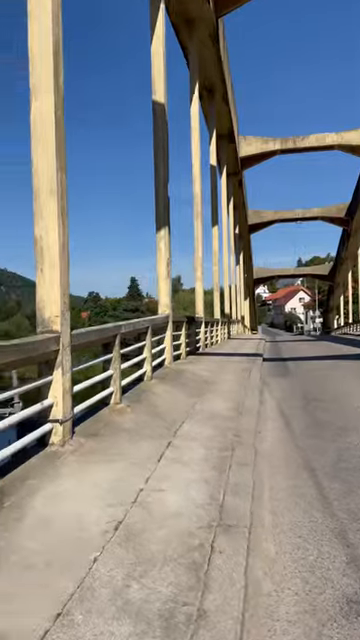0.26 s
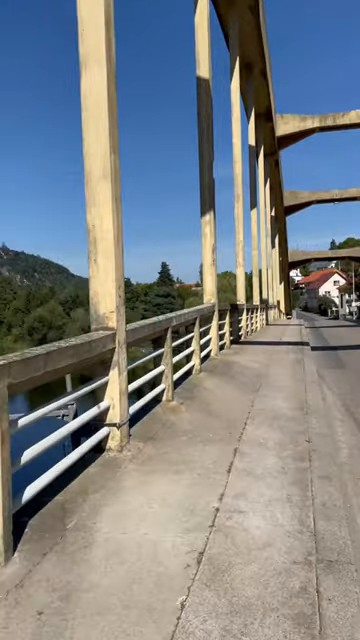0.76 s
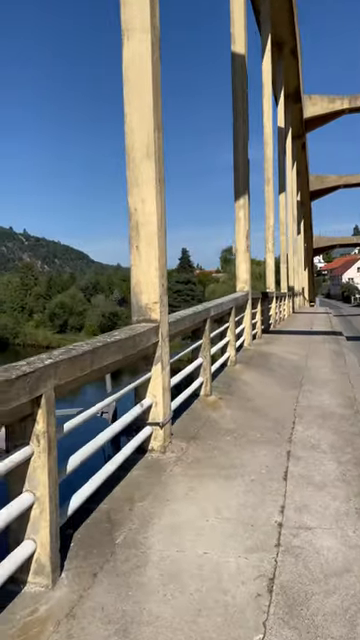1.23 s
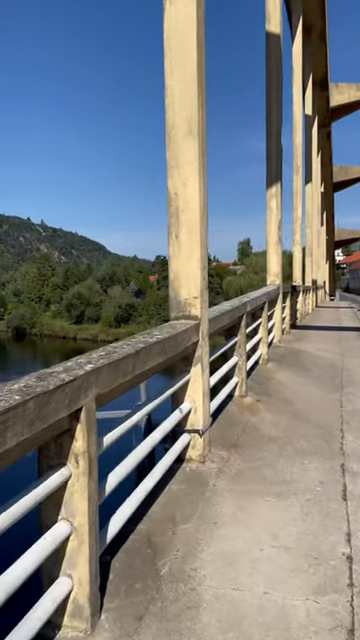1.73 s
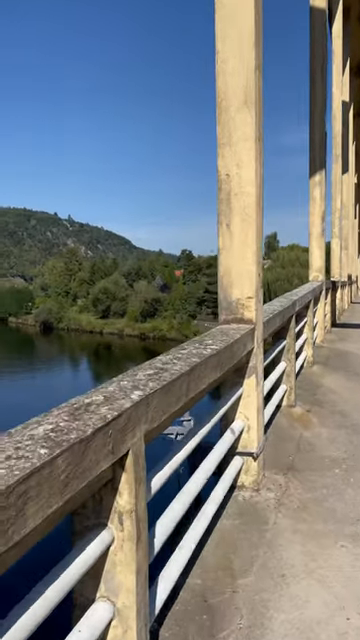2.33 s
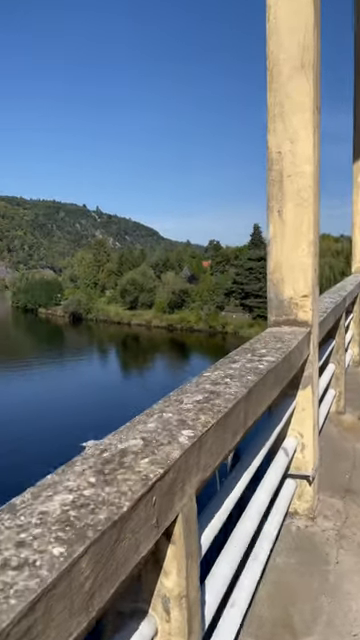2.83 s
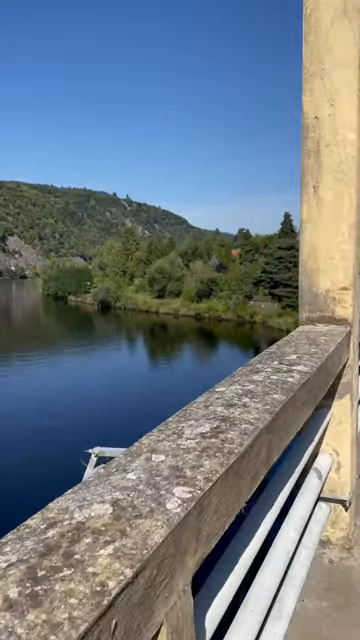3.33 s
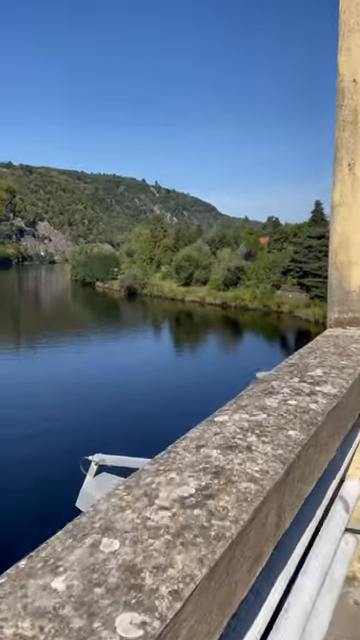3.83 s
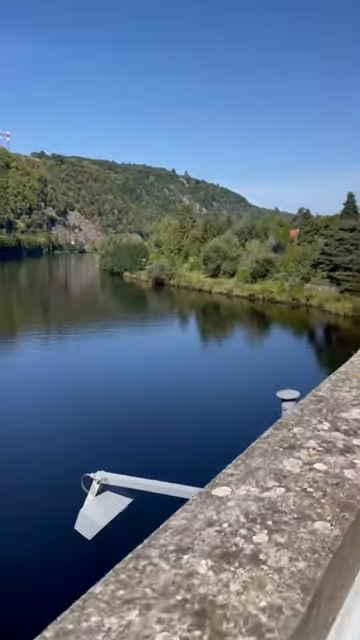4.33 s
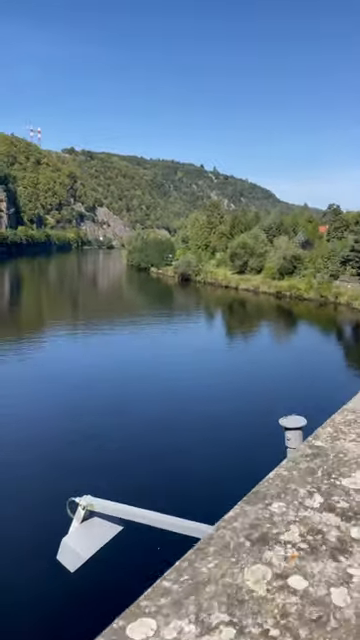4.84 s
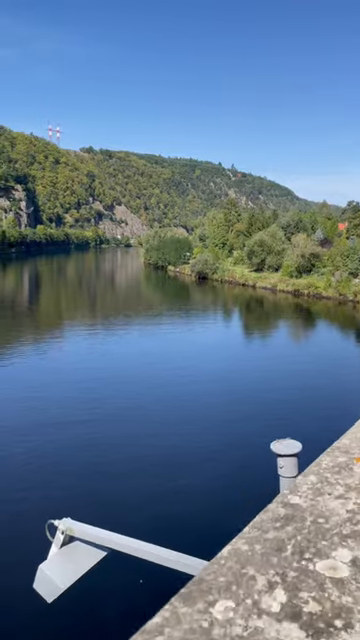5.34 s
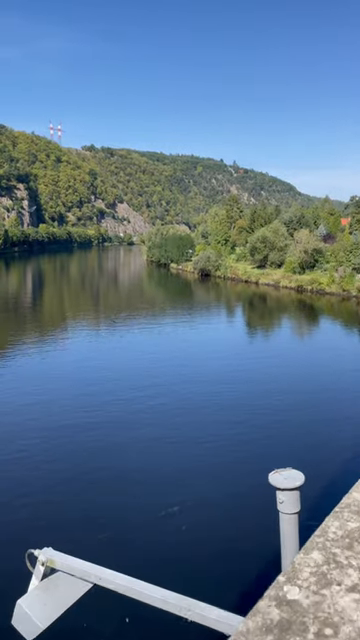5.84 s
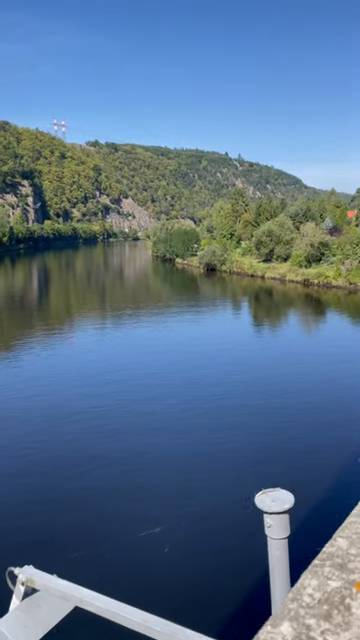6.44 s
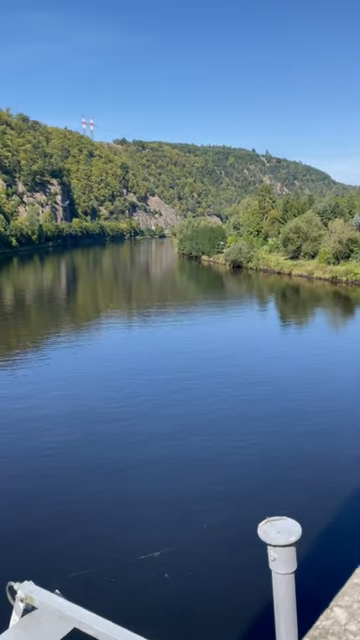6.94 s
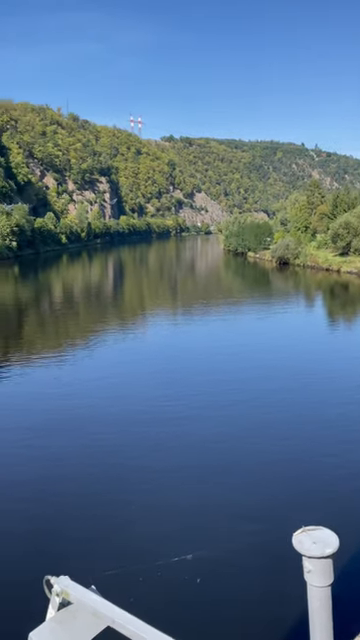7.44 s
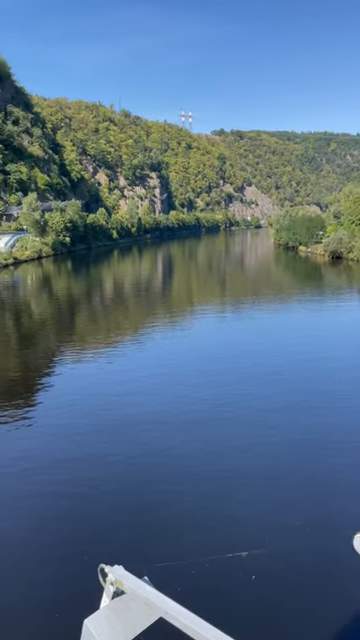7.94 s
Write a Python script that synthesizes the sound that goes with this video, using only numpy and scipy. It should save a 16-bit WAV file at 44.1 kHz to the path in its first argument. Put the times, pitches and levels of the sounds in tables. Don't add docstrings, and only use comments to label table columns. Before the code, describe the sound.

A heavy vehicle pulls up through its gear and shifts on a bridge, tyres roaring past, deck joints thumping, keys jingling faintly close by.

```python
import sys
import numpy as np
from scipy import signal
from scipy.fft import rfft, irfft, next_fast_len
from scipy.io import wavfile

SR = 44100
rng = np.random.default_rng(int(sys.argv[2]) if len(sys.argv) > 2 else 0)


def generate_wav(sig):
    pcm = np.round(np.clip(np.atleast_2d(sig).T, -1, 1) * 32767).astype(np.int16)
    wavfile.write(sys.argv[1], SR, pcm)


def boost(x):
    u = np.asarray(x, float) / 20
    return 10 ** u


N = 360738
COARSE = 40


def in_time(rows):
    start_s, *columns = np.transpose(rows)
    t = np.arange(N) / SR
    gate = np.clip(np.minimum(t - start_s[0] + .1, start_s[-1] + .1 - t) / .1, 0, 1)
    return [np.interp(t, start_s, column) for column in columns], gate


def at_hz(points, hz, column=1):
    table = np.array(points)
    return np.interp(np.log(hz), np.log(table[:, 0]), table[:, column])


def fine(coarse, at=None):
    samples = np.arange(N) if at is None else at
    return np.interp(samples / COARSE, np.arange(len(coarse)), coarse)


def drift(rate_hz):
    pole = np.exp(-2 * np.pi * COARSE * rate_hz / SR)
    noise = rng.standard_normal(N // COARSE + 2001)
    slow = signal.lfilter([1], [1, -2 * pole, pole * pole], noise)[2000:]
    return slow / slow.std()


def band(x, low_hz, high_hz):
    return signal.sosfilt(signal.butter(2, [low_hz, high_hz], "band", fs=SR, output="sos"), x)


def clicks_at(times_s, sizes):
    out = np.zeros(N)
    out[(np.asarray(times_s) * SR).astype(int)] = sizes
    return out


def ring(clicks, hz, t60_s):
    pole = boost(-60 / (t60_s * SR))
    turn = 2 * np.pi * hz / SR
    return signal.lfilter([0, np.sin(turn)], [1, -2 * pole * np.cos(turn), pole * pole], clicks + 1e-18)


def orders(hz, gate, multiples, levels_db, wobble_db, stray_rad):
    on = np.flatnonzero(gate)
    out = np.zeros(N)
    phase = 2 * np.pi * np.cumsum(hz[on]) / SR
    for k, level_db in zip(multiples, levels_db):
        size = np.sqrt(2) * fine(boost(level_db[::COARSE] + wobble_db * drift(5.7)), on)
        stray = fine(stray_rad * drift(2.4), on)
        out[on] += gate[on] * size * np.sin(k * phase + stray + 7 * k)
    return out


def swell(start_s, end_s, start_hz, end_hz, peak_db, multiple=1):
    rows = [(start_s, start_hz, peak_db - 4),
            ((start_s + end_s) / 2, (start_hz + end_hz) / 2, peak_db),
            (end_s, end_hz, peak_db - 4)]
    (hz, level_db), gate = in_time(rows)
    return orders(hz, gate, [multiple], [level_db], wobble_db=1.5, stray_rad=.3)


# start_s, firing_hz, level_db, boom_db (exhaust), rasp_db
ENGINE_PULL = [(0, 55.74, -43, -60, -51.5), (.12, 57, -39, -51, -55), (.25, 57.8, -46, -53, -53),
               (.5, 59.4, -39, -43, -56), (.8, 61.8, -43.5, -40.5, -54),
               (1.2, 65.33, -37.5, -47, -52.5), (1.48, 67.83, -35.5, -35.5, -44),
           (1.8, 70.8, -34.5, -37, -43.5), (2.15, 74.5, -36.5, -34.5, -40.5),
           (2.3, 75.28, -29.5, -34.5, -54), (2.58, 77.85, -30.5, -35.5, -49), (2.72, 79.2, -31, -25.5, -55),
           (3.1, 82, -33.5, -22.5, -51.5), (3.35, 84.1, -33.5, -30, -43)]
# start_s, firing_hz, level_db, boom_db, rasp_db
GEAR_SHIFT = [
    (3.72, 85.1, -32, -30.5, -52.5),
    (3.9, 85.54, -33.5, -25.5, -55),
    (4.019, 84.45, -44.5, -32.5, -52),
    (4.15, 77.9, -26.5, -30, -59),
    (4.35, 70.34, -50, -25.5, -57),
    (4.52, 63.75, -49, -34.5, -60),
    (4.75, 59.5, -47.5, -47, -45),
]
# firing_multiple, level_db
RASP_ORDERS = [(3.5, -6), (4, -2), (13 / 3, 2.4), (14 / 3, -9), (5, -2), (5.5, 0), (6.7, -16)]
# pitch_hz, gain_db
PIPE_GAIN = [(165, -2), (172, 4), (180, 1), (188, -10), (238, -16), (247, -4), (255, -10)]


def heavy_engine():
    (hz, level_db, boom_db, rasp_db), gate = in_time(ENGINE_PULL + GEAR_SHIFT)
    third_db = level_db + at_hz(PIPE_GAIN, 3 * hz)
    firing = orders(hz, gate, [1, 2, 3], [level_db, boom_db, third_db], wobble_db=1.5, stray_rad=.2)
    multiples = [k for k, db in RASP_ORDERS]
    levels_db = [rasp_db + db for k, db in RASP_ORDERS]
    return firing + orders(hz, gate, multiples, levels_db, wobble_db=3.0, stray_rad=0.74)


# shaft_multiple, start_s, end_s
ONCOMING_SWELLS = [(2, 2.15, 3.75), (3, 2.25, 2.4), (3, 2.5, 3.0), (3, 3.15, 3.78), (5, 2.15, 2.35),
                   (5, 2.5, 3.05), (6, 2.45, 3.05), (6, 3.3, 3.8)]
ONCOMING_PEAKS = [-38, -36, -36, -33, -34, -33.5, -37, -36.5]


def oncoming_engine():
    def shaft_hz(s):
        return 38.9 - 3.5 * (s - 2.05)

    out = np.zeros(N)
    for (k, start_s, end_s), peak_db in zip(ONCOMING_SWELLS, ONCOMING_PEAKS):
        out += swell(start_s, end_s, shaft_hz(start_s), shaft_hz(end_s), peak_db, k)
    return out


# start_s, end_s, start_hz,
# end_hz
FAR_HUMS = [(0, .72, 100, 101), (.15, .7, 228, 244), (1.35, 1.75, 157, 162), (4.4, 4.75, 321, 324),
            (3.95, 4.7, 79, 80), (4.8, 5.3, 86.5, 84), (4.7, 5.6, 74, 71), (5.75, 6.05, 68.5, 67),
            (4.0, 5.35, 48.5, 47.8), (5.52, 5.65, 62, 60), (6.05, 6.55, 47.5, 45.8), (4.62, 5.0, 172, 152),
            (5.3, 5.78, 138, 129), (5.88, 6.33, 190, 180.5), (6.9, 7.1, 184.3, 184.5),
            (6.25, 7.05, 113.5, 112), (7.18, 7.3, 109, 109), (7.4, 7.5, 112.5, 112),
            (7.72, 8.3, 107, 104.5), (6.65, 6.85, 66, 66.7), (7.15, 7.42, 65.5, 66), (7.55, 7.72, 64.5, 65),
            (8.02, 8.3, 65, 63.5), (7.75, 8.3, 238, 226), (7.9, 8.3, 171.7, 169), (7.62, 7.75, 132, 130),
            (.05, .18, 47, 46), (4.95, 5.3, 191, 192)]
FAR_HUM_PEAKS = [-41, -44, -43.5, -43, -33.5, -35, -35, -37, -39, -40, -45, -35, -35.5, -35.5, -40, -39,
                 -33.5, -34.5, -31, -37, -33, -32, -31.5, -40.5, -44, -37.5, -37, -43]


def far_engines():
    return sum(swell(*row, peak_db) for row, peak_db in zip(FAR_HUMS, FAR_HUM_PEAKS))


# start_s, peak_db, ring_hz
DECK_JOINTS = [(1.144, -24, 141), (1.174, -17, 179), (1.204, -16.5, 190), (1.256, -24, 243),
               (1.299, -20.5, 176), (1.324, -20, 211), (2.099, -18, 140), (2.224, -16, 188),
               (2.299, -16.5, 159), (2.347, -14, 142), (2.375, -14, 156), (2.519, -14.5, 139),
               (2.547, -19, 132.3), (2.708, -12.5, 156), (2.739, -25, 161), (5.57, -16, 136)]


def joints():
    out = sum(ring(clicks_at([s], boost(db)), hz, t60_s=0.053) for s, db, hz in DECK_JOINTS)
    return band(out, 70, 450)


# pitch_hz, level_db, t60_s
MODES = [
    (6815, -14, .035),
    (9200, -18, .025),
    (9950, -6, .03),
    (14510, -13, .04),
    (15300, -10, .035),
]
# start_s, high_ring_db, low_ring_db, tick_db
BUNCH = [(0.0014, -45, -45, -65), (0.0214, -53, -48, -59), (0.0513, -51, -50, -57), (0.071, -51, -43, -56),
         (0.0844, -51, -49.5, -57), (0.0997, -46, -50, -66), (0.1114, -53, -51, -61),
         (0.122, -51, -50, -58), (0.6335, -57, -45, -54), (1.8053, -49, -60, -62)]
# start_s, high_ring_db, low_ring_db, tick_db
KEY_TICKS = [(0.2633, -74, -75, -59), (0.5641, -65, -75, -52), (0.621, -57, -75, -53),
             (0.6544, -65, -75, -55), (0.7816, -64, -75, -60), (0.8734, -61, -75, -55),
             (1.0326, -65, -76, -66), (1.1395, -51, -62, -45), (1.152, -64, -75, -50),
             (1.3119, -63, -75, -63), (1.367, -63, -70, -59), (1.4037, -63, -75, -67),
             (1.501, -59, -75, -49), (1.8976, -49, -75, -55), (6.2647, -62, -75, -50),
             (6.3824, -62, -75, -56), (7.1536, -66, -75, -61), (7.3622, -59, -77, -59),
             (7.8311, -65, -75, -66), (8.155, -58, -75, -53)]


def keys():
    start_s, high_db, low_db, tick_db = np.transpose(BUNCH + KEY_TICKS)
    chance = rng.normal(0, 1, (len(start_s), 8))
    bounce_s = 0.0051
    out = np.zeros(N)
    for k, (hz, level_db, t60_s) in enumerate(MODES):
        ring_db = high_db if hz > 12000 else low_db
        size = boost(ring_db + level_db + 4.0 * chance[:, k])
        touches = clicks_at(start_s, size) + clicks_at(start_s + bounce_s, 1.2 * size)
        out += ring(touches, hz, t60_s)
    decay = signal.lfilter([1], [1, -.992], clicks_at(start_s, boost(tick_db + 0.5)))
    return out + band(decay * rng.standard_normal(N), 6800, 14000)


# start_s, edge_db (bright), body_db (hollow)
GRIT_TICKS = [(3.019, -46, -47), (4.4455, -46, -55), (4.4555, -55, -37), (4.4595, -44, -44),
              (4.4745, -40, -50), (4.4845, -49, -32), (4.495, -48, -50), (4.7894, -55, -55),
              (5.3655, -41, -43), (5.467, -45, -39), (5.8719, -49, -50), (6.4994, -51, -50),
              (7.048, -53, -46)]
# low_hz, high_hz, level_db
GRIT_BANDS = [
    (2200, 3300, 0),
    (4000, 5000, -6),
    (5900, 8600, 2),
    (8800, 14500, -10),
]


def scuffs():
    start_s, edge_db, body_db = np.transpose(GRIT_TICKS)
    grit = rng.standard_normal(N)
    trail_s = .003
    out = 0
    for low_hz, high_hz, level_db in GRIT_BANDS:
        tick_db = level_db + (body_db if high_hz < 3500 else edge_db)
        blow = clicks_at(start_s, boost(tick_db) * SR / 2 / (high_hz - low_hz)) + 1e-18
        trail = .15 * grit * signal.lfilter([1], [1, -np.exp(-1 / (trail_s * SR))], blow)
        out = out + band(blow + trail, low_hz, high_hz)
    return out


# start_s, roar_db (tread), hiss_db (nearest tyres), left_right_db
ROAD_LEVELS = [(0, -49.5, -62, 2.5), (.9, -48, -59, 0.5), (1.4, -44, -57, 0.5), (2.0, -41, -53, 0),
               (2.65, -38.5, -49, -3), (3.08, -34, -42, -2.5), (3.3, -32.5, -43, -3),
               (3.6, -31.5, -43, -1.5), (3.8, -32.5, -46, -1), (3.95, -34.5, -49.5, -1),
               (4.4, -35, -52, -1.5), (5.0, -36, -52, -1.5), (5.4, -36, -50.5, -3),
               (6.0, -36.5, -52.5, -.5), (6.65, -38.5, -55, 0.7), (7.0, -40, -56.5, .8),
               (7.7, -41.5, -54.5, 2), (8.18, -42, -57, 2)]
# pitch_hz, density_db (per Hz)
DECK_RUMBLE = [(32, -22), (45, -3.5), (60, 0), (110, -1), (200, -1), (300, -20.5)]
# pitch_hz, density_db (per Hz)
BODY_DRONE = [(130, -8), (220, -2.5), (330, -3), (480, -8), (700, -14), (1000, -35)]
# pitch_hz, density_db (per Hz)
TREAD_ROAR = [(450, -18), (700, -3.5), (1050, -3.5), (1350, -7.5), (1800, -8.5), (2200, -14.5),
              (3000, -23.5), (4000, -32)]
# pitch_hz, density_db (per Hz)
TYRE_HISS = [(1500, -17), (2300, 0), (3000, 3.5), (3600, -0.5), (4600, -5), (5600, -12.5), (8000, -14.5),
             (10500, -21), (13000, -23), (15500, -29.5)]
# pitch_hz, likeness (0-1), left_right_db
MIC_PORTS = [(60, .998, 0.1), (110, 0.99, 1), (178, 1, 3.5), (330, 0.94, 2), (527, 0.37, 5),
             (950, 0.45, -1.5), (1680, 0.72, 1), (2770, 0.37, 2), (3720, 0.08, 2), (5300, 0.6, 2.5),
             (6800, 0.57, -1), (9000, 1, 0)]


def traffic(patchy_db, brighten):
    roar_db, hiss_db, pan_db = [column[::COARSE] for column in in_time(ROAD_LEVELS)[0]]
    swing_db = roar_db + 39
    t = np.arange(0, N, COARSE) / SR
    deck_db = -39 + 0.4 * swing_db + 0.6756 * t
    drone_db = -35 + 0.7 * swing_db - 0.85 * t
    sources = [(DECK_RUMBLE, deck_db), (BODY_DRONE, drone_db), (TREAD_ROAR, roar_db), (TYRE_HISS, hiss_db)]
    edges_hz = 32 * 2 ** (np.arange(28) / 3)
    centres_hz = np.sqrt(edges_hz[1:] * edges_hz[:-1])
    power = 0
    for spectrum, level_db in sources:
        inside = (centres_hz > spectrum[0][0] / 1.2) & (centres_hz < spectrum[-1][0] * 1.2)
        shape = boost(2 * at_hz(spectrum, centres_hz)) * inside
        density = shape / np.sum(shape * np.diff(edges_hz)) * SR / 2
        power = power + np.outer(density, boost(2 * level_db))

    white = rng.standard_normal((2, 2, N))
    together = drift(6.1)
    out = 0
    for k, hz in enumerate(centres_hz):
        shared, apart = band(white[k % 2], edges_hz[k], edges_hz[k + 1])
        alike = np.clip(at_hz(MIC_PORTS, hz), 0, 1)
        mid, side = np.sqrt(1 + alike) * shared, np.sqrt(1 - alike) * apart
        near_db = brighten * (hiss_db + 56.0) * max(np.log2(hz / 5000), 0)
        patches_db = patchy_db * (0.58 * together + drift(15.0))
        gain = np.sqrt(power[k] / 2) * boost(near_db + patches_db)
        tilt_db = .5 * pan_db * (600 < hz < 5000)
        left = fine(gain * boost(tilt_db)) * (mid + side)
        right = fine(gain * boost(-tilt_db)) * (mid - side)
        out = out + np.array([left, right])
    return out


def scene():
    engines = heavy_engine() + oncoming_engine() + far_engines()
    hand = (keys() + scuffs()) * boost(3.0 * np.array([[.5], [-.5]]))
    air = signal.butter(14, 14700, fs=SR, output="sos")
    wash = signal.sosfilt(air, traffic(patchy_db=1.03, brighten=0.46))
    return engines + joints() + hand + wash


def roll_off(x):
    return signal.sosfilt(signal.butter(12, 16170, fs=SR, output="sos"), x)


# pitch_hz, lead_rad
PORT_LEAD = [(0, 0), (400, 0.34), (520, 0.73), (620, -1.84), (1700, 0), (2200, 1.23), (3300, -3),
             (3700, -1.7), (4400, 5), (5400, 5.5), (7900, 8.5), (8800, 9.5), (11400, 10), (12600, 11.0),
             (14500, 11.5), (22050, 10.5)]
# pitch_hz, gain_db
PHONE_BODY = [(0, -0.5), (450, 0), (570, 2.5), (800, 1), (1040, 4), (1220, 0), (2050, -1.5), (2900, 2.5),
              (3550, 2.5), (3850, -0.5), (4500, 4.5), (4950, 0), (5200, -3), (5600, 3.5), (9000, 2)]


def record(dry):
    size = next_fast_len(N + 2048)
    hz = np.fft.rfftfreq(size, 1 / SR) + 1e-3
    top_cut = 1 / np.sqrt(1 + (hz / 15500) ** 160)
    colour = boost(np.interp(hz, *np.transpose(PHONE_BODY))) * top_cut
    balance = boost(np.outer([.5, -.5], at_hz(MIC_PORTS, hz, column=2)))
    lead_rad = np.interp(hz, *np.transpose(PORT_LEAD))
    phase = np.exp(np.outer([.5j, -.5j], lead_rad))
    ports = irfft(rfft(dry, size) * colour * balance * phase, size)[:, :N]
    ports = signal.sosfilt(signal.butter(2, 36, "high", fs=SR, output="sos"), ports)
    return roll_off(ports)


dry = scene()
out = record(dry)
generate_wav(out)
```